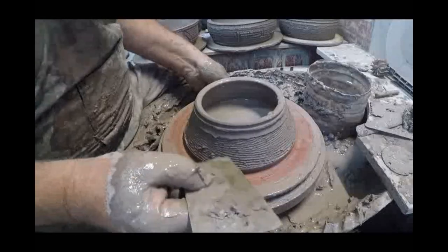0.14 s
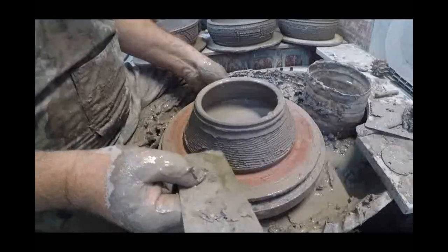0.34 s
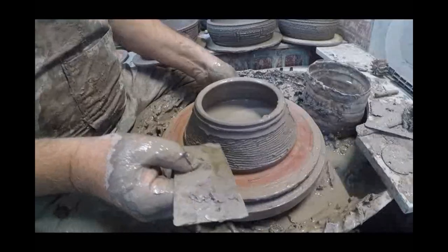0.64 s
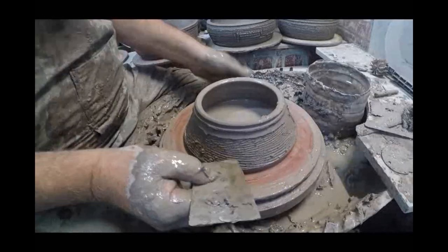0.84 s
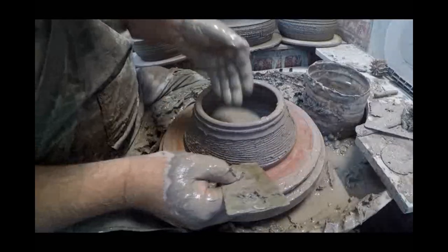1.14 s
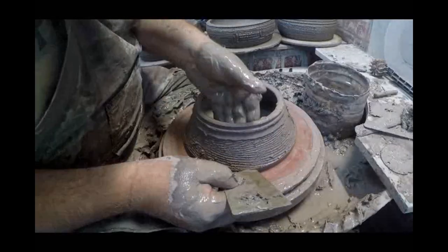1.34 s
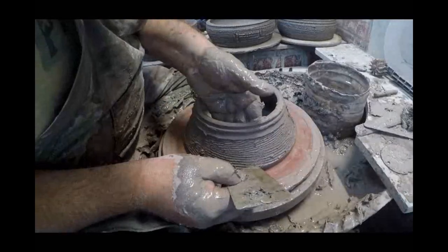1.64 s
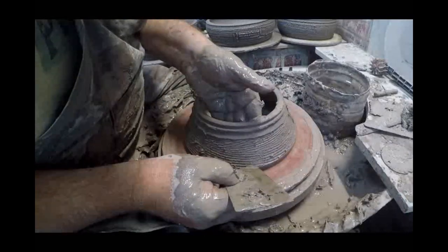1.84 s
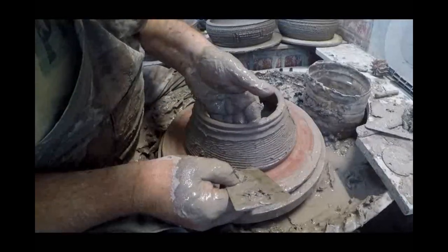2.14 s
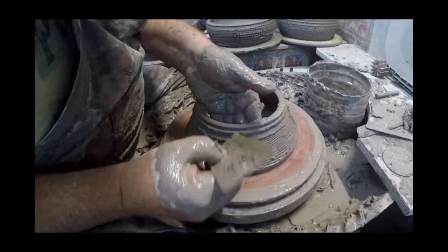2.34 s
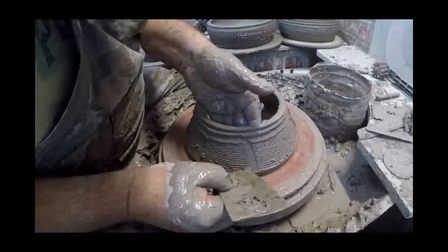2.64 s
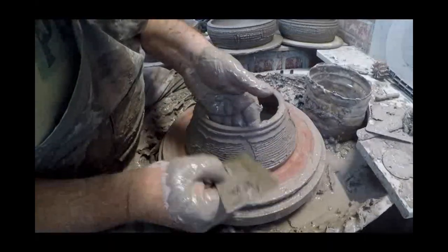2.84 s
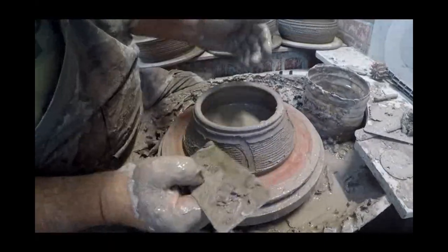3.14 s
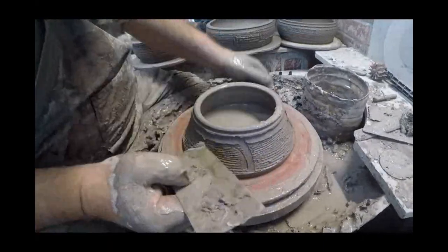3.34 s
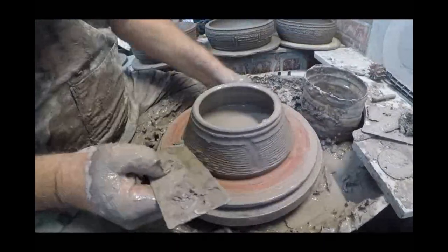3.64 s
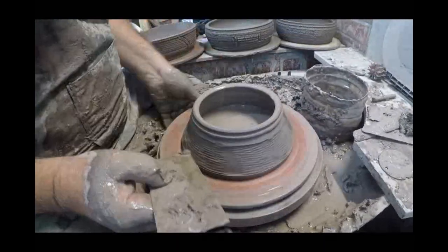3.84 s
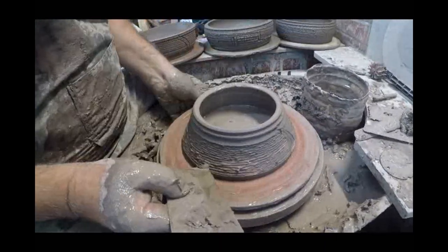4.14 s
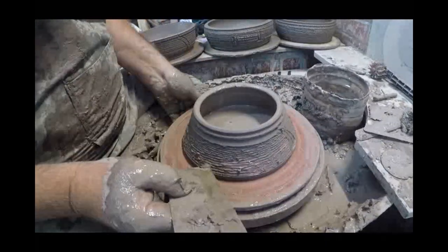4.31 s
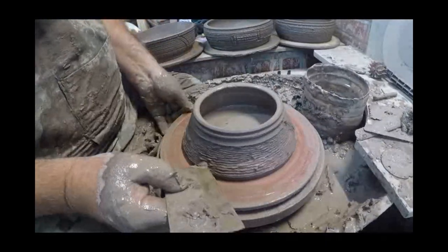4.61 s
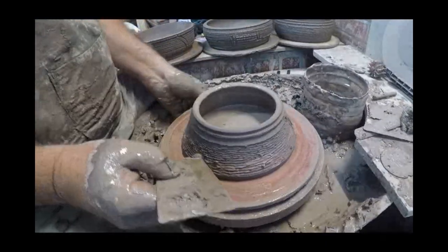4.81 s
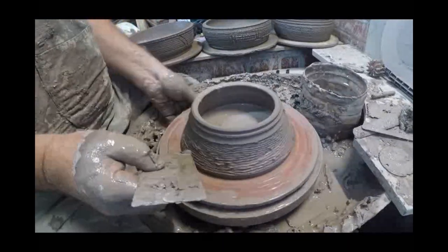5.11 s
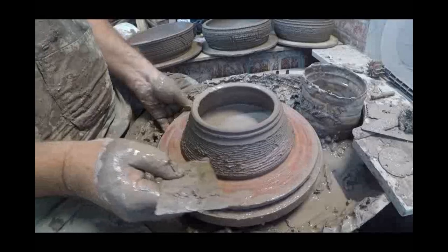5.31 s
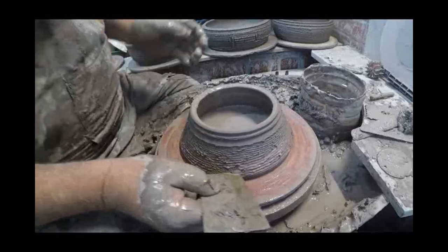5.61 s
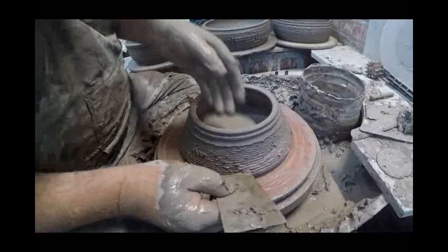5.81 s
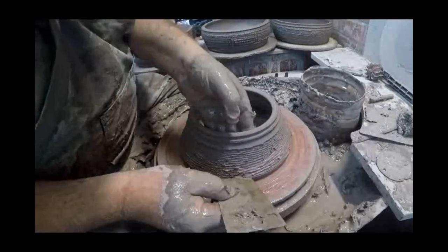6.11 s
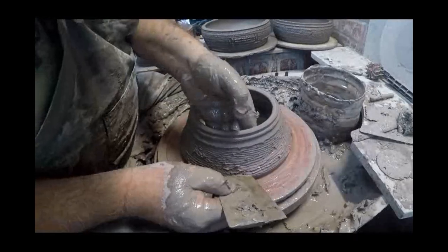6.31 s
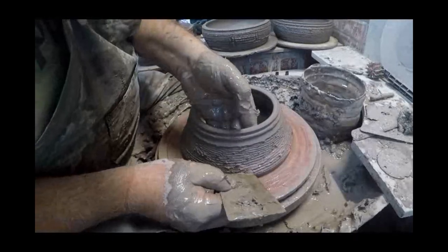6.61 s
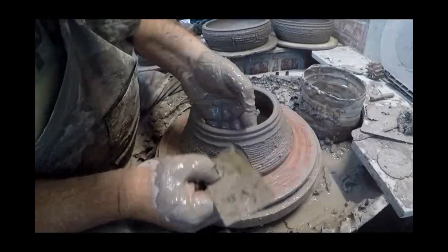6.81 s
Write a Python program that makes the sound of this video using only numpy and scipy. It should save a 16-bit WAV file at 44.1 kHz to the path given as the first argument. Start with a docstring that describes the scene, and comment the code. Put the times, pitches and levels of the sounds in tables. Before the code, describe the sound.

Close, constant low motor hum of a potter's wheel, with light bright scrapes on wet clay clustering midway and soft bumps underneath.

```python
"""A steady electric hum comes first: a potter's wheel in a studio, close to a two-port microphone. The motor
drones at twice the mains rate under thin overtones, and noise rings the frame's modes. Short strokes of
filtered grit are a flat tool on wet clay, among faint hollow notes, squeaks and a knock. Behind them lie low
shaking and soft bumps through the stand, and a diffuse hiss of air and wet clay."""
import sys
import numpy as np
from scipy import signal
from scipy.fft import rfft, irfft, next_fast_len
from scipy.io import wavfile
from scipy.ndimage import uniform_filter1d

SR = 44100
rng = np.random.default_rng(int(sys.argv[2]) if len(sys.argv) > 2 else 0)


def persist_wave(psi):
    """Save psi, clipped to +-1, as 16-bit WAV."""
    counts = np.round(np.clip(psi, -1, 1) * 32767).astype(np.int16)
    wavfile.write(sys.argv[1], SR, np.atleast_2d(counts).T)


N = 307105


def amp(db):
    """Decibels to amplitude."""
    return 10 ** (np.asarray(db) / 20)


def evened(x):
    """Scales x to rms 1."""
    return x / np.sqrt(np.mean(x ** 2) + 1e-20)


def read(points, hz):
    """Columns of a table over log frequency."""
    f, *columns = np.transpose(points)
    return [np.interp(np.log(hz + 1), np.log(f + 1), c) for c in columns]


def curve(rows):
    """Columns of a table over time, one value a sample."""
    s, *columns = np.transpose(rows)
    return np.array([np.interp(np.arange(N) / SR, s, c) for c in columns])


def shaped(x, gain):
    """Multiplies the whole spectrum of x by gain(Hz)."""
    size = next_fast_len(N)
    return irfft(rfft(x, size) * gain(np.fft.rfftfreq(size, 1 / SR)), size)[..., :N]


def mode(hz, centre_hz, width_hz):
    """A resonance applied twice; white noise of power 1 comes out with power 1."""
    unit = np.sqrt(2 * SR / (np.pi * width_hz))
    detuning = (hz ** 2 - centre_hz ** 2) / (hz * width_hz + 1e-9)
    return unit / (1 + 1j * detuning) ** 2


def drift(rate_hz):
    """Random wandering of rms 1: noise that fades out above about rate_hz."""
    return evened(shaped(rng.standard_normal(N), lambda hz: np.exp(-(hz / rate_hz) ** 2)))


def ports(left_db, right_db, lead):
    """Complex gains of the left and right port, as a column; left leads by `lead` radians."""
    return np.array([amp(left_db) * np.exp(1j * lead), amp(right_db) + 0j]).reshape(2, -1)


def ringing(drive, modes):
    """Sends one mono drive through several modes of the frame to both ports."""
    return shaped(drive, lambda hz: sum(ports(*place) * mode(hz, f, w) for f, w, *place in modes))


def diffuse(table, patchy_db, size):
    """Random short-time spectra, partly alike in the ports, with drifting patches."""
    frames, hz = 4 * N // size + 5, np.fft.rfftfreq(size, 1 / SR)
    left_db, right_db, like, lead = read(table, hz)
    a, b, c, d, patches = rng.standard_normal((frames, len(hz), 5)).T
    patches = uniform_filter1d(patches, size=8, axis=0)  # smooth over frequency
    patches = evened(uniform_filter1d(patches, size=12, axis=1))  # smooth over time
    like = np.clip(like, 0, 1)[:, None]
    right = a + 1j * b
    left = like * right + np.sqrt(1 - like ** 2) * (c + 1j * d)
    z = np.array([left, right])
    z *= ports(left_db, right_db, lead)[..., None] * amp(patchy_db * patches)
    unit = np.sqrt(3 / 2 * SR / size)  # makes the tables read in dB per Hz
    return unit * signal.istft(z, nperseg=size, noverlap=size * 3 // 4)[1][:, :N]


# The motor's magnetic pull as it reaches the two ports.
# Each row: time in seconds, left level in dB, right level in dB.
HUM_LEVELS = [(0, -18, -11), (.56, -17.5, -11), (3, -17.5, -10.5), (5.41, -17.5, -10.5), (6.96, -18, -11.5)]
HUM_HZ, HUM_LEAD = 100.173, -.19  # pitch, and the radians by which left leads
# Overtones of the motor and its shaft.
# Each row: pitch in Hz, left level in dB, right level in dB, radians by which left leads.
OVERTONES = [(225.3, -57.8, -46.8, 0.46), (250.4, -65.5, -53.3, 0.62), (300.2, -59.1, -51.9, 0.57),
             (400.7, -55.9, -48.3, 2.18), (519.7, -53.4, -47.8, 2.63), (599.7, -55.2, -50.2, 2.77),
             (700.1, -58.4, -51.0, -3.09), (899.1, -66.5, -59.8, 3.06), (998.7, -77.6, -69.3, 2.94),
             (1049.1, -63.9, -69.8, -1.8), (1099.0, -68.4, -63.3, -2.53), (1124.0, -78.7, -69.5, 2.35),
             (1174.0, -84.8, -70.9, 0.49), (1199.4, -85.2, -71.2, -2.75), (1299.3, -78.7, -71.6, 2.37),
             (1499.7, -71.0, -69.3, 0.36), (1800.2, -73.0, -66.7, 0.37), (3630.4, -86.0, -82.2, 0.88)]
JITTER_S, JITTER_HZ = 4e-5, 8.  # the shaft runs a little early or late: rms, rate


def motor():
    """A clean drone and thin overtones that waver in level; shaft jitter blurs the high ones most."""
    t = np.arange(N) / SR
    drone = np.exp(2j * np.pi * HUM_HZ * t + .02j * drift(0.32))
    out = ports(*curve(HUM_LEVELS), HUM_LEAD).reshape(2, N) * drone
    shaft = t + JITTER_S * drift(JITTER_HZ)
    for hz, *place in OVERTONES:
        waver = evened(amp(2.2 * drift(5.)))
        out += ports(*place) * waver * np.exp(2j * np.pi * (hz * shaft + rng.random()))
    return np.sqrt(2) * out.real  # the levels are rms


# Touches of the flat tool on the wet clay, close to the microphone.
# Each row: touch in seconds, rise in s, hold in s, fall in s, hiss level in dB before the port gains,
# ring of the tool over the hiss in dB, brightness in dB, core pitch in Hz.
STROKES = [(0.817, .028, .01, .05, -65, -4, 0, 7500), (2.24, 0.024, .03, 0.047, -57.5, -10, 3, 9200),
           (2.285, 0.021, 0.05, 0.04, -54, -12, 2.5, 7760), (2.376, .004, .008, .03, -64, -9, 2, 8200),
           (2.869, .004, .007, .015, -54, -12, 0, 8700), (2.886, .006, 0.02, .04, -58.5, -9, 4, 5200),
           (2.918, .006, .025, 0.033, -60, -10, 0, 8200), (2.975, .01, .015, .06, -62, -8.5, 0, 7500),
           (3.47, 0.018, 0.056, 0.13, -64, -6, 4.5, 6960), (3.594, 0.029, .05, .08, -62, -5, -0.5, 7000),
           (3.797, .004, 0.011, 0.23, -52.5, -7, -4, 6500),
           (3.896, 0.017, 0.022, 0.063, -53.5, -3, -2, 6200), (3.935, 0.015, 0.039, 0.05, -56, -2, 0, 6650),
           (3.983, .01, 0.039, .04, -61, 1.5, -1, 6300),
           (4.007, 0.038, 0.014, 0.056, -48.5, -2.5, -3, 7200),
           (4.061, 0.012, 0.031, 0.09, -54.5, 0, 1.5, 7140), (4.66, 0.081, .02, 0.18, -59.5, -3, 1, 6940),
           (5.696, 0.15, .05, .2, -63, -7, -0.5, 7500), (6.678, 0.068, 0.052, .06, -56, -7, 2.5, 8400)]
# Colour of the scraping hiss at each port; only its shape counts.
# Each row: frequency in Hz, left in relative dB per Hz, right in relative dB per Hz.
SCRAPE_COLOUR = [(1200, -12, -9), (1980, -2, -1), (3430, -7, -6.5), (4870, -3.5, -4.5), (6500, 1, -3.5),
                 (7500, -2, -3), (8500, -7, 0), (9700, -5, -3), (11000, -11, -10), (12900, -16, -17),
                 (14800, -29, -28)]
# Resonances of the flat tool, relative to one another.
# Each row: centre in Hz, width in Hz, relative level in dB.
TOOL_MODES = [(1500, 300, 7.5), (1750, 230, -3.5), (2900, 3500, 1), (2660, 350, -5), (4060, 400, -12.5)]
FOOT_DB = -16  # a stroke starts and ends its ramps this far from its hold
DULLING_DB_PER_S = 16.5  # the edge clogs and the hiss loses brightness along a stroke
CORE_WIDTH_HZ, CORE_DB, CORE_SAG_HZ_PER_S = 1800, -9, 6000  # a brighter core that sinks
ECHO_S, ECHO_DB = .005, -25  # the pot and pan close by smear each stroke and comb its colour


def tool():
    """Grit under the edge makes dense uneven clicks: a bright hiss with a core, and the flat tool rings."""
    clicks_db = 1.7 * rng.exponential(1, N)
    grit = rng.standard_normal((2, N)) * amp(clicks_db + .8 * drift(40.0) + 1.4 * drift(300.))
    grit[0] += 0.2 * grit[1]
    hiss = evened(shaped(grit, lambda hz: amp(read(SCRAPE_COLOUR, hz))))
    dull = shaped(hiss, lambda hz: 1 / (1 + (hz / 7500.) ** 6))
    ring = evened(shaped(grit, lambda hz: sum(amp(db) * mode(hz, f, w) for f, w, db in TOOL_MODES)))
    out, lag = np.zeros((2, N)), np.arange(SR // 40) / SR
    smooth = signal.butter(2, CORE_WIDTH_HZ / 2, fs=SR)
    for touch, rise, hold, fall, hiss_db, ring_db, bright_db, core_hz in STROKES:
        start = round(touch * SR)
        here = slice(start, start + SR // 2)
        t = np.arange(len(out[0, here])) / SR
        corners = np.cumsum([0, rise, hold, fall])
        press_db = np.interp(t, corners, [FOOT_DB, 0, 0, FOOT_DB], right=-120)
        dulled_db = DULLING_DB_PER_S * np.maximum(t - rise, 0)
        # a lighter, faster touch fizzes higher
        tilted = dull[:, here] + amp(bright_db - dulled_db) * (hiss - dull)[:, here]
        # grit shifted down to zero, low-passed and shifted back leaves a band that follows the core
        turn = np.exp(2j * np.pi * (core_hz * t - CORE_SAG_HZ_PER_S * t ** 2 / 2))
        core = evened((turn * signal.lfilter(*smooth, grit[:, here] / turn)).real)
        mix = tilted + amp(CORE_DB) * core + amp(ring_db) * ring[:, here]
        sound = amp(hiss_db + press_db) * mix
        smear = rng.standard_normal((2, len(lag))) * np.exp(-lag / ECHO_S)
        echoes = (lag == 0) + amp(ECHO_DB) * smear
        echoes /= np.linalg.norm(echoes[0])
        out[:, here] += signal.fftconvolve(sound, echoes, axes=1)[:, :len(t)]
    return out * amp([[1.5], [2.1]])  # left and right port gains in dB


# Modes of the frame and splash pan, close by, in rising order.
# Each row: centre in Hz, width in Hz, left level in dB, right level in dB, radians by which left leads;
# the levels hold for a drive of 0 dB.
FRAME_MODES = [(21.0, 14.0, -34.9, -33.3, -0.31), (48.0, 11.0, -40.8, -37.4, -0.38),
               (64.0, 12.0, -38.4, -33.5, -0.29), (219.0, 60.0, -56.1, -45.8, 0.31),
               (356.0, 17.0, -46.6, -37.1, 1.83), (397.0, 28.0, -56.6, -48.0, 2.11),
               (434.0, 12.0, -65.0, -56.5, 2.25), (500.0, 10.0, -56.8, -50.4, 2.6),
               (520.0, 23.0, -48.0, -43.6, 2.7), (606.0, 33.0, -51.7, -48.0, 2.75),
               (634.0, 22.0, -44.4, -41.8, 2.92), (662.0, 20.0, -44.4, -41.5, 3.07),
               (691.0, 45.0, -48.0, -41.3, -3.11), (727.0, 27.0, -48.0, -42.6, -3.05),
               (791.0, 24.0, -58.8, -52.5, -2.97), (829.0, 18.0, -63.2, -54.7, 2.95),
               (886.0, 21.0, -73.3, -60.5, 3.09), (933.0, 13.0, -62.5, -55.6, 2.75),
               (970.0, 21.0, -67.7, -64.1, -2.83), (1004.0, 35.0, -67.4, -62.5, 2.95),
               (1184.0, 57.0, -78.1, -62.1, 3.06), (1296.0, 41.0, -71.0, -66.9, 1.92),
               (1425.0, 35.0, -77.0, -66.3, 1.75), (1488.0, 100.0, -67.0, -62.2, 1.27)]
DEEP_BELOW_HZ = 150  # modes under this follow the sway, the others the rumble
# Level of the deep sway. Each row: time in seconds, level in dB.
SWAY_LEVEL = [(0, -6), (.6, -5.5), (1.4, -1.5), (2.1, -0.5), (3.2, -0.5), (4.5, -2), (5.1, 1), (6, 4),
              (6.96, 3)]
# Level of the bearing rumble. Each row: time in seconds, level in dB.
RUMBLE_LEVEL = [(0, -1), (.9, 0.5), (2, -0.5), (3, 1), (4.4, 1), (5.4, 0), (6.96, -1)]
TURN_HZ = 2.4  # mean turns of the wheel head a second


def frame():
    """The stand sways in its deep modes; bearing rumble, swelling once a turn, rings the higher ones."""
    t = np.arange(N) / SR
    turn = np.cos(2 * np.pi * TURN_HZ * t + 0.26 * drift(0.62))
    deep = [row for row in FRAME_MODES if row[0] < DEEP_BELOW_HZ]
    high = FRAME_MODES[len(deep):]
    out = np.zeros((2, N))
    for modes in [deep, high[::2], high[1::2]]:  # neighbouring high modes are driven from unlike places
        if modes is deep:
            drive_db = curve(SWAY_LEVEL)[0] + 0.79 * drift(7.2)
        else:
            drive_db = curve(RUMBLE_LEVEL)[0] + 0.89 * turn + 1.4 * drift(8.2)
        out += ringing(rng.standard_normal(N) * amp(drive_db), modes)
    return out


# Single modes of the frame that swell for a moment.
# Each row: peak in seconds, half length in s, mode in Hz, level against its 0 dB ring in dB.
SURGES = [(0.701, 0.17, 662, 5), (1.219, 0.054, 356, 6.5), (3.199, 0.23, 520, 5.5),
          (3.798, 0.071, 356, 4.5), (4.407, .2, 356, -4), (5.246, .25, 662, 10.5), (5.872, 0.075, 356, 7.5),
          (6.099, 0.18, 520, 8.5)]


def surges():
    """Extra rumble for a moment through the nearest mode of the frame."""
    t, out = np.arange(N) / SR, np.zeros((2, N))
    for peak_s, half_s, hz, over_db in SURGES:
        nearest = min(FRAME_MODES, key=lambda row: abs(row[0] - hz))
        swell = np.exp(-((t - peak_s) / half_s) ** 2)
        out += amp(over_db) * swell * ringing(rng.standard_normal(N), [nearest])
    return out


# Faint hollow notes and squeaks, and a brief knock near 6.5 s, the same in both ports. Each row: start in
# seconds, length in s, pitch in Hz, glide in Hz per s, width of the waver in Hz, peak level before the waver in
# dB.
NOTES = [(0.798, 0.15, 900, 398, 35, -56), (.94, .098, 975, 698, 35, -52), (2.882, .036, 3950, 0, 300, -63),
         (3.62, .03, 4130, 0, 120, -62), (3.658, .018, 4050, 0, 120, -62),
         (3.803, .016, 6500, -1, 500, -53), (3.932, .038, 4150, 0, 90, -59),
         (3.98, .06, 4150, -1000, 120, -63), (4.027, .02, 2650, 4, 150, -54),
         (4.096, 0.03, 4060, -2000, 100, -58), (5.528, 0.027, 2900, -2, 99, -58.5),
         (6.536, .05, 693, -2, 50, -42.5), (6.542, .02, 1000, -1, 300, -49),
         (6.742, 0.061, 5260, 0, 110, -61)]
NOTE_WAVER_DB, NOTE_WOBBLE = 4., 2.  # rms straying of a note's level, and of its phase in radians
NOTE_EDGE = 0.15  # share of a note's length taken by each fade


def notes():
    """Each is a broken, wobbling tone carried along a steady or sliding pitch."""
    out = np.zeros(N)
    for start, length, hz, glide, width_hz, level_db in NOTES:
        t = np.arange(N) / SR - start
        phase = 2 * np.pi * (hz * t + glide * t ** 2 / 2)
        waver = amp(NOTE_WAVER_DB * drift(width_hz))
        tone = waver * np.cos(phase + NOTE_WOBBLE * drift(width_hz))
        fades = np.clip(np.minimum(t, length - t) / (NOTE_EDGE * length), 0, 1)
        out += amp(level_db) * fades * tone
    return out


# Low shaking that reaches the microphone through its stand.
# Each row: frequency in Hz, left and right level in dB per Hz before the sway and drift,
# likeness of the ports from 0 to 1, radians by which left leads.
SHAKE_SPECTRUM = [(10, -60, -60, .8, -.3), (35, -68, -62, .3, -.4), (85, -58.5, -53, .7, -.2),
                  (130, -60, -56, .6, -.1), (200, -72, -67, .5, .3), (330, -74.5, -68, .3, 1.2),
                  (560, -72, -68.5, .8, 2.8), (1000, -84, -80, .6, 3.1), (1700, -100, -97, .3, 2.),
                  (4000, -140, -140, 0, 0)]
# Soft bumps against the stand.
# Each row: start in seconds, left level in dB, right level in dB, rough top of the band in Hz, rise in s.
BUMPS = [(.3, -37, -29, 70, .04), (2.1, -48, -38, 220, .015), (3.62, -42, -26, 130, .035)]


def stand():
    """Lumpy low noise that partly follows the sway, and dull bumps of low noise that swell and die."""
    shake_db = 0.2 * curve(SWAY_LEVEL)[0] + 1.2 * drift(9.)
    out = diffuse(SHAKE_SPECTRUM, 0.97, size=2048) * amp(shake_db)
    t = np.arange(SR // 3) / SR
    for start, left_db, right_db, top_hz, rise in BUMPS:
        swell = (t / rise) * np.exp(1 - t / rise)
        thud = swell * drift(top_hz)[:len(t)]
        thud *= np.linalg.norm(swell) / np.linalg.norm(thud)  # same energy at every draw
        out[:, round(start * SR):][:, :len(t)] += amp([[left_db], [right_db]]) * thud
    return out


# Studio air and the wet clay's steady hiss, from no one direction.
# Each row: frequency in Hz, left and right level in dB per Hz before the swell,
# likeness of the ports from 0 to 1, radians by which left leads.
WASH_SPECTRUM = [(500, -95, -93, .2, 3.), (1000, -83, -81, .2, 3.), (1600, -86, -84.5, .2, .6),
                 (2100, -88.5, -88, .3, 2.), (2600, -90.5, -90.5, .2, 1.5), (3300, -93.5, -93.5, .3, .2),
                 (4000, -96, -95.5, .5, 0), (4800, -98, -97.5, .1, 0), (7300, -95, -94.5, .1, 0),
                 (9000, -99, -97, .1, 0), (10900, -103, -102.5, .1, 0), (11300, -108, -108, .1, 0),
                 (12600, -110, -110, .1, 0), (14900, -127, -127, .1, 0)]
# Rise and fall of the hiss. Each row: time in seconds, level in dB.
WASH_LEVEL = [(0, -2), (1, -0.5), (2.3, -2.5), (3.3, -1), (5.2, -0.35), (6.96, -1)]


def wash():
    """Diffuse hiss with a slow swell."""
    return diffuse(WASH_SPECTRUM, 1.3, size=512) * amp(curve(WASH_LEVEL)[0] + 0.3 * drift(2.1))


def scene():
    """Everything that reaches the two ports, summed."""
    return motor() + tool() + frame() + surges() + notes() + stand() + wash()


EDGE_HZ = 14950


def record(dry):
    """The recorder's band limit: a steep low-pass."""
    lowpass = signal.firwin(511, EDGE_HZ, window=("kaiser", 9), fs=SR)
    return signal.oaconvolve(dry, lowpass[None], "same")


dry = scene()
out = record(dry)
persist_wave(out)
```